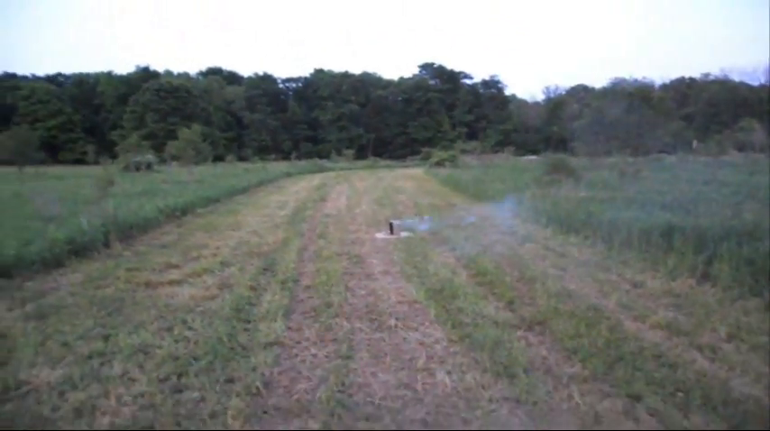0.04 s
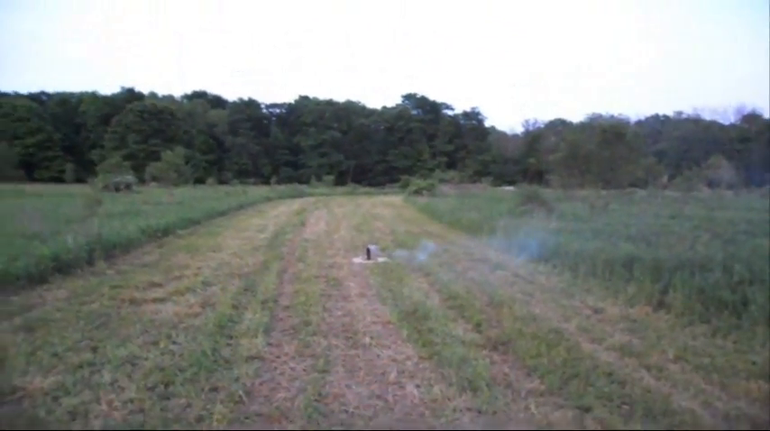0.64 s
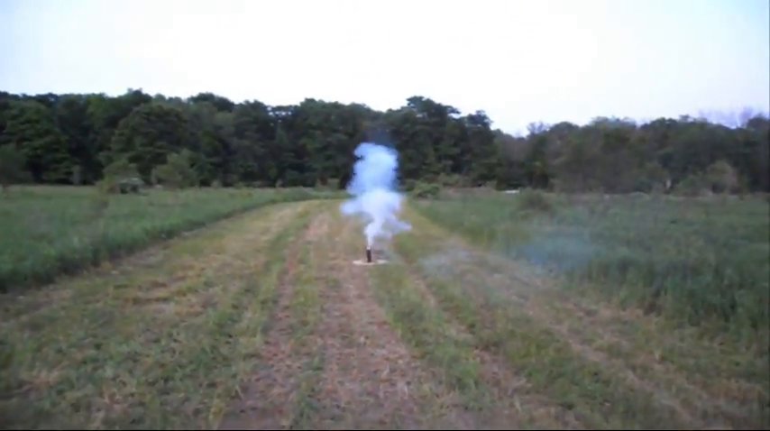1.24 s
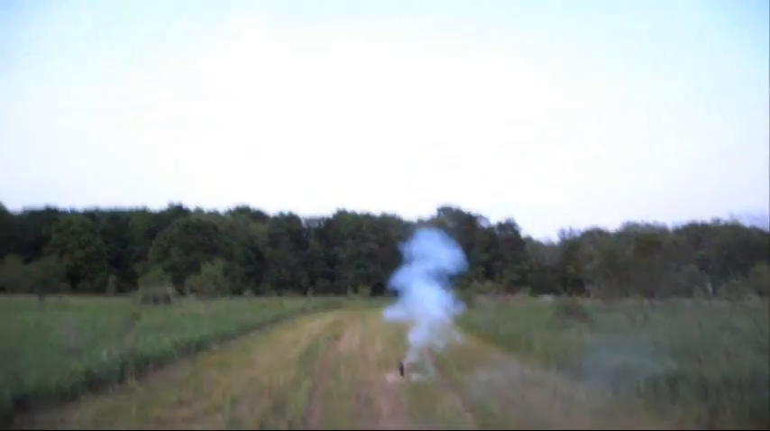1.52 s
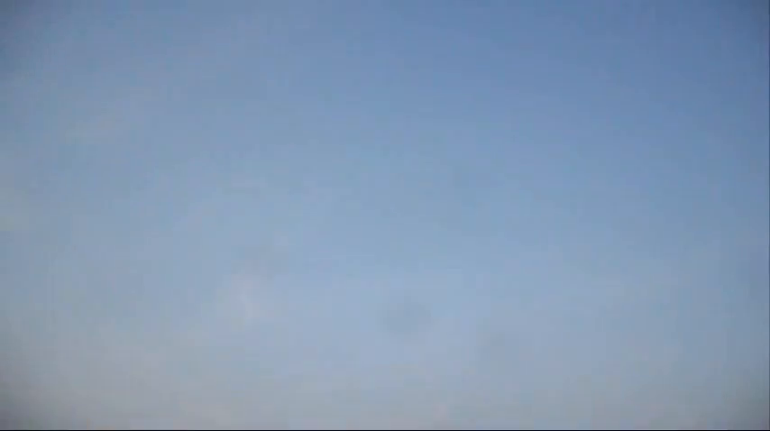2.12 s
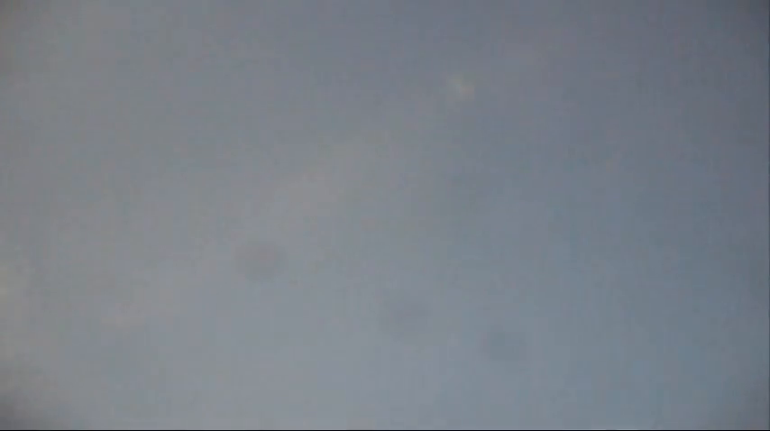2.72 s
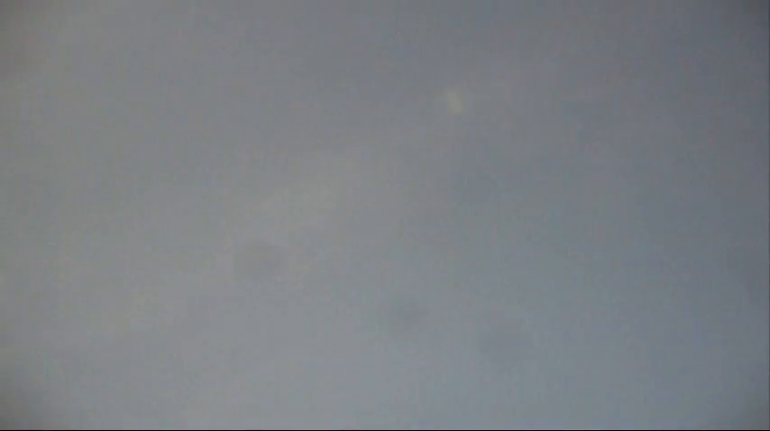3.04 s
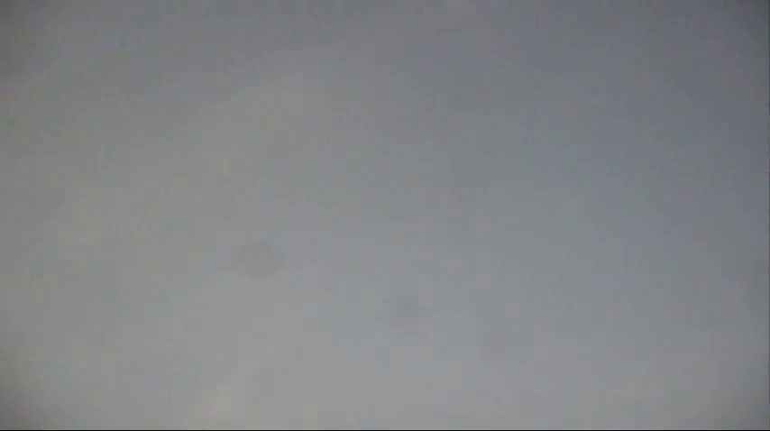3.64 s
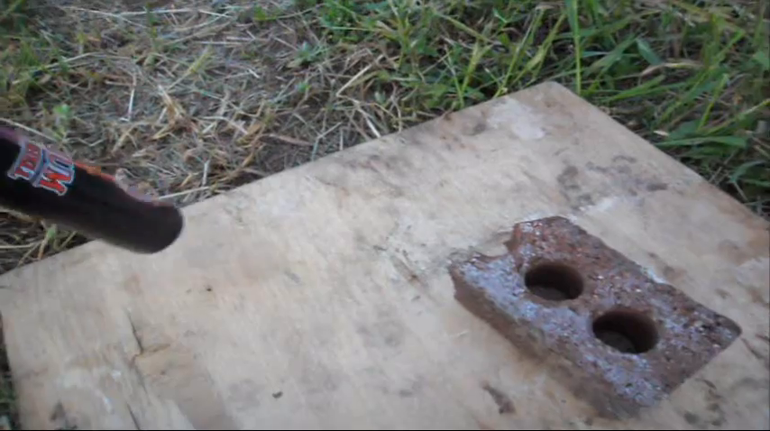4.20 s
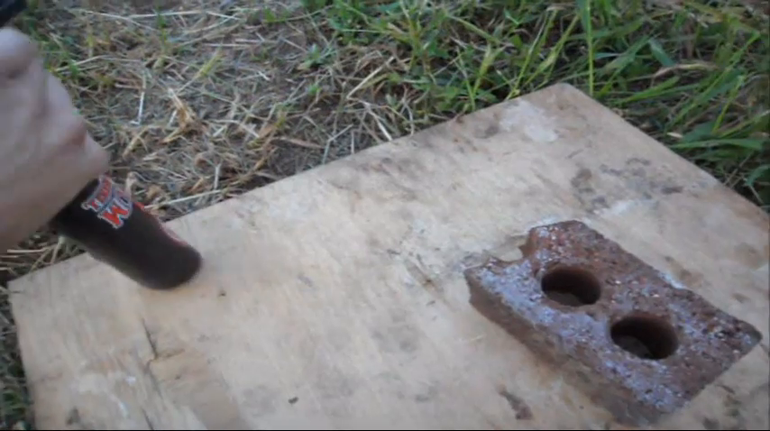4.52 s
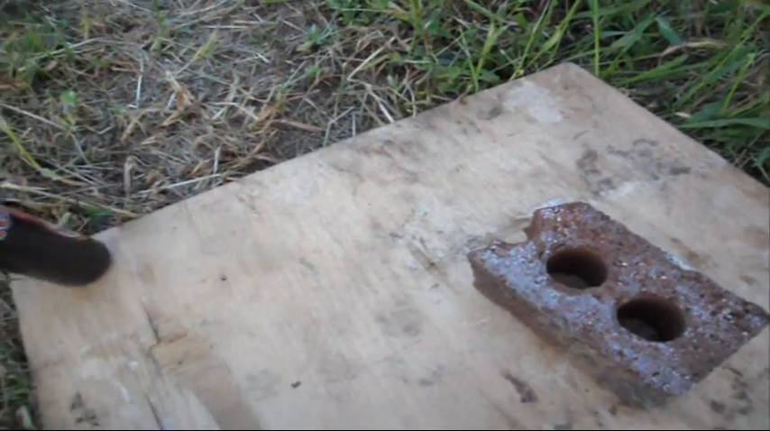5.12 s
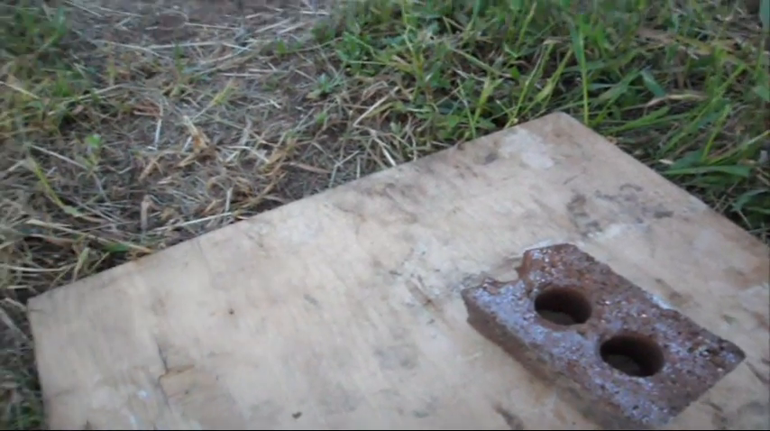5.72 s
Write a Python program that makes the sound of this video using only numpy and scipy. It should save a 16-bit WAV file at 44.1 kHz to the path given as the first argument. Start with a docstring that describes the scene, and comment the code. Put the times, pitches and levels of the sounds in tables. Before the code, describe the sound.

A quiet outdoor hiss and light wind rumble fill an open field, with two soft puffs at about 0.2 and 0.7 seconds. At 1.2 seconds a firework shell blasts out of its tube with a sharp bang and a brief, low echo, and the background dips. At about 2.1 seconds the shell bursts overhead with a hard crack. Both bangs overload the small microphone. The surrounding woods scatter the burst back as a long, grainy hiss, with a soft, low thump near 2.7 seconds, growing duller as it fades. At 4.3 seconds the echo cuts off and the background becomes quieter. From 4.4 to 5.4 seconds, close by, the empty tube knocks seven times, unevenly, on its plywood base. The knocks are hollow and ring briefly, starting faint, with the last two loudest. Faint outdoor air remains until about 6 seconds.

```python
"""First comes a quiet outdoor hiss, with a light wind rumble and two soft puffs.
Then gas blasts a firework shell out of a tube in a mown field, and a second later it bursts overhead.
Both bangs overload a small microphone. The woods scatter the burst back as a long, grainy hiss.
Last, close by, the empty tube is knocked seven times on its plywood base, which rings briefly."""
import sys
import numpy as np
from scipy import signal
from scipy.fft import rfft, irfft, next_fast_len
from scipy.io import wavfile

SR = 44100
rng = np.random.default_rng(int(sys.argv[2]) if len(sys.argv) > 2 else 0)


def to_wav(sig):
    """Store sig (one row per channel, or 1-D mono) as 16-bit WAV at the path in sys.argv[1].

    Samples outside -1..1 are clipped; the rate is SR.
    """
    pcm = np.clip(np.atleast_2d(sig), -1, 1) * 32767
    pcm = np.round(pcm).astype(np.int16)
    wavfile.write(sys.argv[1], SR, pcm.T)  # frames by channels


N = 262659
TIME = np.arange(N) / SR

# A "colour" says how strong the low and high pitches of a sound are next to each other.
# colours of microphone hiss, outdoor air and wind rumble: f/Hz, level/dB
HISS_COLOUR = [(100, 7), (2000, 5.5), (4000, 2.5), (7000, 0), (10000, -2.5), (15300, -4.5), (15800, -34.5)]
AIR_COLOUR = [(40, -6), (170, -1), (480, 0.5), (700, -4), (1000, -4.5), (1400, -9), (1900, -8.5),
              (3200, -19), (6000, -26.5), (15000, -45)]
RUMBLE_COLOUR = [(10, -0.5), (35, 0), (80, -3.5), (160, -14), (400, -35), (1500, -70)]
# the background dips at the launch, returns, and is quieter by the board: t/s, change/dB, settling/s
BACKGROUND_STEPS = [(1.2, -14, .015), (2.36, 9, .27), (4.285, -5, 0.0047), (4.78, 3.5, 0.17)]
# soft puffs, rustles, taps and lone far echoes: t/s, level/dB, centre f/Hz, width/octaves, decay/s
PUFFS = [(0.241, -38, 500, 0.64, 0.012), (0.702, -35.5, 535, 0.77, 0.013), (1.2305, -23, 1530, .8, .003),
         (1.367, -49.5, 1510, .9, 0.0071), (1.39, -57.5, 2020, .3, .11), (1.602, -52, 2080, 0.34, 0.022),
         (1.692, -39.5, 68.4, 0.3, .012), (2.218, -34, 880, 0.42, 0.007), (4.07, -52.5, 1830, 0.4, 0.14),
         (4.974, -45, 912, .2, 0.009), (5.42, -56.5, 1750, 0.29, 0.15), (5.875, -54.5, 4000, .7, .025)]

# blows of the tube: t/s, strength/dB, f/Hz favoured by the spot, hardness/dB, pitch factor, tick/dB
KNOCKS = [(4.4455, -19.5, 235, 1, 1, -38.5), (4.5140, -18.5, 226, -1, 1.01, -46),
          (4.8009, -6.5, 307, 4.5, 0.966, -35), (4.9141, -8, 278, 9.5, .985, -24.5),
          (5.0886, -3, 320, -2, 1.017, -28.5), (5.2117, 8, 264.4, -3, 1.021, -19),
          (5.3661, 8.5, 271.7, 4.5, 0.98, -23)]
# natural tones of board and tube, before each blow alters them: f/Hz, level/dB, time to fade 60 dB/s
BOARD_TONES = [(168.5, -32, 0.25), (240, 6, .013), (261, -15, 0.046), (290.2, 10.6, .015),
               (326.5, -18.5, 0.076), (376, -20, 0.029), (441.2, -10, 0.045), (480, -8, 0.026),
               (664, -23.5, 0.052), (891, -24, 0.05), (1001, 1.5, 0.0072), (1320, -28.5, 0.025),
               (2140, -20, 0.014), (2276, -25, 0.02), (2600, -26, 0.021)]
# colour of the tick as tube meets board: f/Hz, level/dB
TICK_COLOUR = [(110, 0), (700, -9.5), (1050, 7.5), (1500, -11.5), (2200, 6), (3300, -21), (5100, -7.5),
               (7600, -21), (15200, -22.5)]

# launch echoes off grass, then field: t/s, boom/dB, boom decay/s, hiss/dB, hiss decay/s, echoes per s
LAUNCH_ECHOES = [(1.2, -27.5, .06, -35.5, 0.039, 6000), (1.34, -53.5, .25, -60, 0.18, 1100)]
# colours of their low boom and grainy hiss: f/Hz, level/dB
BOOM_COLOUR = [(20, 0), (80, 0), (160, -11), (230, -11), (400, -20), (800, -41), (2000, -80)]
GRAIN_COLOUR = [(105, -9), (410, 3), (920, -3.5), (1420, -5), (2150, -1), (3300, -13), (5400, -10.5),
                (8100, -22), (15100, -27)]
# burst echoes off grass, field and trees: t/s, level/dB, rise/s, hold/s, decay/s, treble/dB per octave
BURST_ECHOES = [(2.144, -38.5, 0.0027, 0.028, 0.026, 6), (2.199, -52, .02, 0.038, 0.22, 5),
                (2.384, -42, 0.098, 0.0088, 0.27, 1), (2.611, -41, 0.097, 0.049, .07, 5),
                (2.66, -36, .1, 0.23, 0.6, 1.5), (3.5, -48.5, .07, .12, .04, -8)]
# colour of those echoes before their treble is tilted: f/Hz, level/dB
WOODS_COLOUR = [(100, -27), (200, -16.5), (300, -7), (420, -1), (600, 1), (950, 2), (1300, -4), (2000, -14),
                (2700, -17.5), (3300, -30.5), (4800, -32), (8000, -46.5), (15000, -54)]

# push, suction and rebound of the air at the launch: t/s, level/dB, half width/s
BLAST_WAVES = [(1.1942, 1.5, 0.0016), (1.2009, 6.5, .0017), (1.2135, -21.5, 0.008)]
# gas jets leaving the tube: t/s, level/dB, rise/s, decay/s
GAS_JETS = [(1.187, -3.5, .0003, 0.0039), (1.1940, -1.5, 0.00048, 0.0046), (1.1961, 8.5, .0008, .0013)]
# colour of the jets: f/Hz, level/dB
JET_COLOUR = [(62, -5), (200, 0.2), (470, 6.5), (820, -7), (1180, -1.5), (1530, -7.5), (2200, 6),
              (2680, -3.5), (3350, -19), (5180, -8), (7650, -21.5), (15050, -28)]
# the shell's crack, its bounce off the grass and its soft thump off the tree line: f/Hz, level/dB
CRACK = [(30, 15), (100, 19.5), (300, 26.5), (600, 31), (1050, 31), (1400, 18), (1900, 12.5), (2600, 17.5),
         (4000, 12), (7000, 3), (15000, -11.5)]
GRASS_BOUNCE = [(30, 3.5), (100, 16), (350, 27), (700, 25.5), (1200, 18), (1700, 3), (2400, 10.5),
                (3500, -16.5), (5000, -33), (15000, -58)]
TREE_THUMP = [(25, -2), (70, 11), (130, 16.5), (180, 12.5), (260, -4), (600, -23), (3000, -60)]


def amp(db):
    """Turns decibels into a number to multiply by."""
    return 10 ** (np.asarray(db) / 20)


def gain_at(colour, hz):
    """Reads a colour as a gain, joining its points with straight lines on a pitch scale."""
    points_hz, db = np.transpose(colour)
    return amp(np.interp(np.log(hz + 1), np.log(points_hz + 1), db))


def coloured(x, colour):
    """Gives x a colour and an average power of one."""
    size = next_fast_len(N)
    gain = gain_at(colour, np.fft.rfftfreq(size, 1 / SR))
    shaped = irfft(rfft(x, size) * gain, size)[:N]
    return shaped / np.sqrt(np.mean(shaped ** 2) + 1e-20)


def noise(colour):
    """Steady noise of the given colour."""
    return coloured(rng.standard_normal(N), colour)


def place(x, start):
    """Puts a short sound at its start time in the scene."""
    return np.pad(x, (round(start * SR), N))[:N]


def swell(start, rise, decay):
    """A loudness curve that rises and dies away."""
    age = np.maximum(TIME - start, 0)
    return (1 - np.exp(-age / rise)) * np.exp(-np.minimum(age / decay, 50))


def plateau(start, rise, hold, decay):
    """A loudness curve that climbs, holds and dies away."""
    age = TIME - start
    return np.clip(age / rise, 0, 1) * np.exp(-np.clip((age - rise - hold) / decay, 0, 50))


def shock(start, colour, size=4096):
    """A sudden pulse of air pressure, with its energy packed at the front."""
    log_gain = np.log(gain_at(colour, abs(np.fft.fftfreq(size, 1 / SR))))
    spectrum = np.exp(np.conj(signal.hilbert(log_gain)))  # each pitch comes as early as it can
    return place(np.fft.ifft(spectrum).real, start)


def scatter(per_s, spread_db):
    """Countless tiny echoes of random sign and size."""
    sizes = amp(spread_db * np.minimum(rng.exponential(1, N), 4))
    return sizes * rng.choice([-1, 1], N) * (rng.random(N) < per_s / SR)


def background(hiss_db=-52.5, air_db=-51, rumble_db=-52.5):
    """Microphone hiss, outdoor air and wind rumble dip and return together, the rumble least."""
    shift_db = sum(db * (1 - np.exp(-np.maximum(TIME - start, 0) / settling))
                   for start, db, settling in BACKGROUND_STEPS)
    hiss = amp(hiss_db + shift_db) * noise(HISS_COLOUR)
    air = amp(air_db + 1.084 * shift_db) * noise(AIR_COLOUR)
    rumble = amp(rumble_db + 0.45 * shift_db) * noise(RUMBLE_COLOUR)
    return hiss + air + rumble


def puffs():
    """Short, soft breaths of noise, each gathered around one pitch."""
    hz, out = np.geomspace(10, SR / 2, num=128), np.zeros(N)
    for start, db, centre_hz, octaves, decay in PUFFS:
        band_db = -30 * np.log10(1 + (np.log2(hz / centre_hz) / octaves) ** 2)
        out += amp(db) * swell(start, decay / 4, decay) * noise(np.c_[hz, band_db])
    return out


def ground_echo(x, level_db=-33, fade_s=0.28):
    """The ground and tall grass add a faint, short tail to a sound."""
    t = np.arange(SR // 2) / SR
    tail = rng.standard_normal(len(t)) * np.exp(-np.log(1000) * t / fade_s)
    return x + amp(level_db) * signal.oaconvolve(x, tail / np.linalg.norm(tail))[:N]


def knocks(build_cycles=1.77, spot_db=20.5, upper_hz=600, chance_db=3.0, leak_hz=115):
    """Each blow ticks and sets the board ringing; the spot struck and the grip change the sound."""
    t, out = np.arange(SR // 2) / SR, np.zeros(N)
    tone_hz, tone_db, fade_s = np.transpose(BOARD_TONES)[:, :, None]
    ticks = noise(TICK_COLOUR)
    for start, db, spot_hz, hardness_db, pitch, tick_db in KNOCKS:
        hz = tone_hz * pitch
        boost_db = spot_db * np.exp(-(2 * np.log2(hz / spot_hz)) ** 2)
        # no two blows stir the upper tones alike
        boost_db += (hardness_db + chance_db * rng.standard_normal(hz.shape)) * (hz > upper_hz)
        # the louder knocks die away sooner
        ring_s = fade_s * 0.87 * np.exp(-0.03 * db)
        # low bending waves travel slowly, so low tones take longest to build up
        build = 1 - np.exp(-(hz * t / build_cycles) ** 3)
        rings = -np.sin(2 * np.pi * hz * t) * build * np.exp(-np.log(1000) * t / ring_s)
        out += place((amp(db + tone_db + boost_db) * rings).sum(0), start)
        out += amp(tick_db) * swell(start, rise=0.00013, decay=0.0028) * ticks
    # air slips round the small board, so it gives off little bass
    return signal.lfilter(*signal.butter(1, leak_hz, "highpass", fs=SR), out)


def launch_echoes(rise_s=0.0072):
    """The launch comes back off the field as a low boom and a thin, grainy hiss."""
    out = np.zeros(N)
    for start, boom_db, boom_decay, hiss_db, hiss_decay, per_s in LAUNCH_ECHOES:
        grains = coloured(scatter(per_s, spread_db=4.0), GRAIN_COLOUR)
        out += amp(boom_db) * swell(start, rise_s, boom_decay) * noise(BOOM_COLOUR)
        out += amp(hiss_db) * swell(start, rise_s, hiss_decay) * grains
    return out


def burst_echoes(treble_hz=900, top_hz=5000, dulling_db_per_octave_per_s=6, stop_s=4.29):
    """Trunks and leaves send the crack back; the longer the path, the more treble the air takes."""
    out = np.zeros(N)
    for start, db, rise, hold, decay, tilt_db in BURST_ECHOES:
        echoes = coloured(scatter(per_s=4500, spread_db=1.5), WOODS_COLOUR)
        hz, t, slices = signal.stft(echoes, SR, nperseg=256)
        octaves = np.log2(np.clip(hz, treble_hz, top_hz) / treble_hz)[:, None]
        tilt = tilt_db - dulling_db_per_octave_per_s * np.maximum(t - start - rise, 0)
        dulled = signal.istft(slices * amp(octaves * tilt), SR)[1][:N]
        out += amp(db) * plateau(start, rise, hold, decay) * dulled
    return out * (TIME < stop_s)  # the listener jumps from the open field to the board


def launch():
    """The charge that lifts the shell: rough jets of gas ride on a push of air and the suction after it."""
    blast = sum((-1) ** k * amp(db) * np.exp(-((TIME - centre) / width) ** 2)
                for k, (centre, db, width) in enumerate(BLAST_WAVES))
    jets = sum(amp(db) * swell(start, rise, decay) for start, db, rise, decay in GAS_JETS)
    return blast + jets * noise(JET_COLOUR)


def burst(crack_s=2.1404, bounce_s=2.1508, thump_s=2.719):
    """The shell cracks overhead; a duller bounce off the grass follows, then a thump from the trees."""
    return shock(crack_s, CRACK) + shock(bounce_s, GRASS_BOUNCE) + shock(thump_s, TREE_THUMP)


def scene():
    """All the sounds meet at one microphone."""
    firework = launch() + launch_echoes() + burst() + burst_echoes()
    return (firework + puffs() + ground_echo(knocks()) + background())[None]


def record(dry, dip_hz=11025, dip_width_hz=420, dip_depth=0.86, top_hz=15900):
    """The microphone flattens loud peaks, weakens a narrow band of treble and loses the very top."""
    clipped = np.clip(dry, -1, 1)
    hz = np.fft.rfftfreq(2 * N, 1 / SR)
    dip = 1 - dip_depth * np.exp(-((hz - dip_hz) / dip_width_hz) ** 2)
    dipped = irfft(rfft(clipped, 2 * N) * dip)[:, :N]
    lowpass = signal.firwin(511, top_hz, window=("kaiser", 9), fs=SR)
    return signal.oaconvolve(dipped, lowpass[None], "same")


dry = scene()
out = record(dry)
to_wav(out)
```